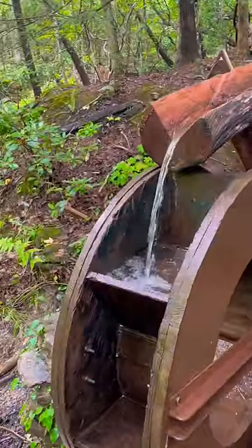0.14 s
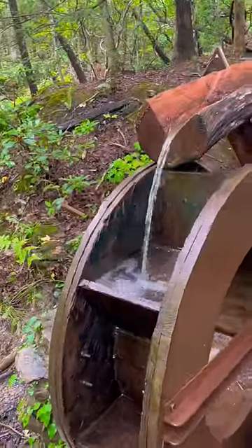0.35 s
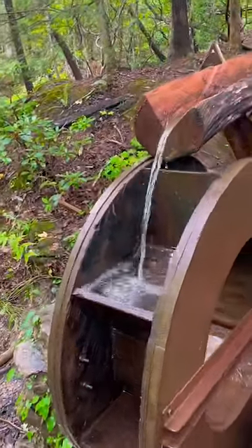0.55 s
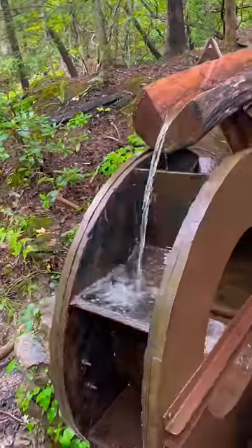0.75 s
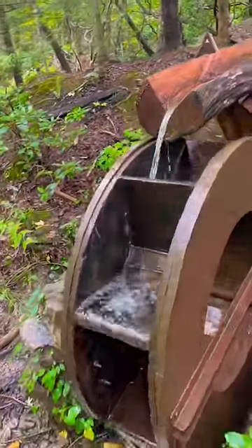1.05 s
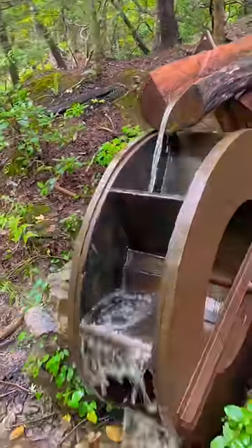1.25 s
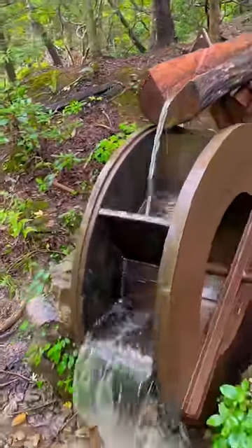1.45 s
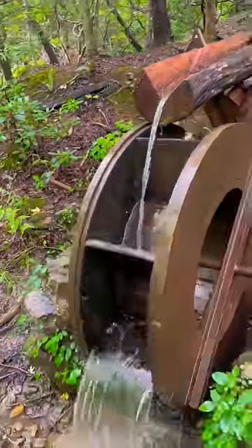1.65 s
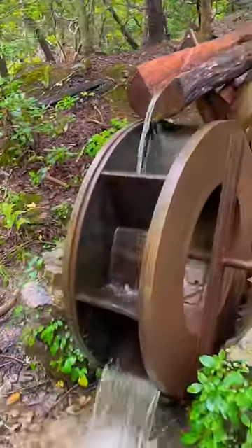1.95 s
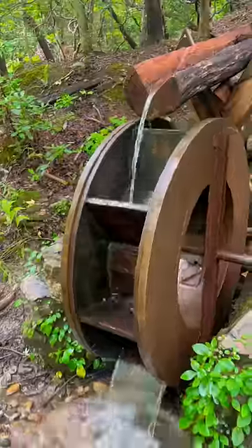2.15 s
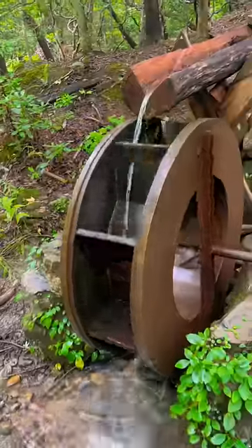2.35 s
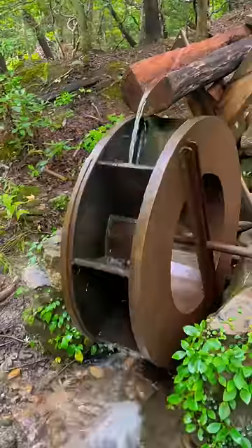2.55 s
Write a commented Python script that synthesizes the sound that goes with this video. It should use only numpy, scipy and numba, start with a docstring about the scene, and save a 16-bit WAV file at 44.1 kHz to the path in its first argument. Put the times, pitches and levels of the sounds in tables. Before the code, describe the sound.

Water wheel outdoors, heard close on a phone in stereo: bright trickling and hollow drumming in a wooden box, a sudden spray and splashing pour with deep gulps, then a quick fade to soft running water.

```python
"""Water wheel bucket fills and tips

A thin stream falls from a log spout into a wooden bucket: ringing bubbles plink and the box sounds hollow.
The wheel turns, a blade cuts the stream, and the bucket tips out: spray first, then a splashing sheet, low
gulps in the pool and last drips. Bubbles are fading sines; slaps, thuds and ticks are puffs of noise.
A brook made of many random bubbles runs behind; a phone with two microphone ports listens from close by."""
import sys
import numpy as np
from scipy import signal
from scipy.fft import rfft, irfft
from scipy.io import wavfile
from numba import njit

SR = 44100
rng = np.random.default_rng(int(sys.argv[2]) if len(sys.argv) > 2 else 0)


def to_wav(s):
    """Save 16-bit WAV."""
    ch = np.atleast_2d(s).T  # columns
    pcm = np.round(np.clip(ch, -1, 1) * 32767)  # PCM
    wavfile.write(sys.argv[1], SR, pcm.astype(np.int16))


N = 119070  # samples, 2.7 s
T = np.arange(N) / SR  # time in seconds
F = np.arange(N + 1) * SR / (2 * N)  # frequencies in Hz of a spectrum twice as long as the sound


def undb(db):
    """Turn decibels into a gain."""
    return 10 ** (np.asarray(db) / 20)


def curve(table, column=1):
    """Join one column of a table by straight lines in time."""
    rows = np.array(table)
    return np.interp(T, rows[:, 0], rows[:, column])


def shape(table):
    """Join a table by straight lines over log frequency."""
    hz, value = np.array(table).T
    return np.interp(np.log(F + 1), np.log(hz), value)


def filtered(x, gain):
    """Apply a frequency response."""
    return irfft(rfft(x, 2 * N) * gain)[..., :N]


def unit(x):
    """Scale to rms 1."""
    return x / np.sqrt(np.mean(x ** 2))


def tinted(pair, colour):
    """Give a sound its colour, at rms 1."""
    return unit(filtered(pair, undb(shape(colour))))


def band(hz, width):
    """Make noise around one pitch, at rms 1; the width is relative to that pitch."""
    offset = (F / hz - hz / (F + 1)) / width
    return unit(filtered(rng.standard_normal((2, N)), 1 / (1 + offset ** 2)))


def surge(rate, depth_db):
    """Make the flow uneven: a gain that heads for a new random level `rate` times a second."""
    knots = rng.standard_normal(1024)
    return undb(depth_db * np.interp(T * rate, np.arange(len(knots)), knots))


# pitch rise over a bubble's life, as a fraction; swell time, as a fraction of its life
GLIDE, SWELL = 0.069, 0.096


@njit
def ring(start, hz, cycles, size, side, glide, swell):
    """Add up bubbles: sines that swell, fade by 60 dB and rise in pitch; row 2 is their sideways scatter."""
    out = np.zeros((2, N))
    for k in range(len(hz)):
        life = cycles[k] * SR / hz[k]  # in samples
        first = int(start[k] * SR)
        phase = 0.
        level, fade = size[k], np.exp(-np.log(1000) / life)
        shut, opening = 1., np.exp(-1 / (swell * life))
        for i in range(max(0, min(int(life), N - first))):
            phase += 2 * np.pi * hz[k] / SR * (1 + glide * i / life)
            level *= fade
            shut *= opening
            value = level * (1 - shut) * np.sin(phase)
            out[0, first + i] += value
            out[1, first + i] += value * side[k]
    return out


def bubbles(table):
    """Play single bubbles from a table, each with its own pitch and ring, without sideways scatter."""
    start, db, hz, cycles = np.array(table, float).T
    start, cycles = np.maximum(start, 0), np.maximum(cycles, 2)
    return ring(start, hz.copy(), cycles, undb(db), 0 * db, float(GLIDE), float(SWELL))


def cloud(rate, low_hz, high_hz, cycles, spread_db):
    """Ring `rate` random bubbles a second, of uneven loudness unless spread_db is 0, with even power per Hz."""
    draws = np.random.default_rng(rng.integers(2 ** 31)).random((int(rate * N / SR), 5))
    when, pitch, loudness, length, place = draws.T
    low, high = np.sqrt(low_hz), np.sqrt(min(high_hz, .4 * SR))
    hz = (low + pitch * (high - low)) ** 2
    # a positive spread makes a few bubbles stand out, a negative one makes a few weaker
    size = undb(-spread_db * np.log(loudness + 0.19)) * hz ** .75
    side = np.sqrt(12) * (place - .5)
    return ring(when * N / SR, hz, cycles * (.5 + length), size, side, float(GLIDE), float(SWELL))


def wooden(modes):
    """Let wood resonate: each mode answers best at its own pitch and rings on for its t60."""
    return sum(undb(db) / (1 + 2j * np.pi * (F - hz) * t60 / np.log(1000)) for hz, db, t60 in modes)


# Tone colour of the brook. Each row: frequency in Hz, relative strength in dB.
BROOK_COLOUR = [(100,-1),(350,-2.5),(800,-5),(1800,-4.5),(4000,-8),(6200,1),(8500,-8),(12000,-7.5),(14000,-24),(16000,-9)]
# Tone colour of the open-air rumble. Each row: frequency in Hz, relative strength in dB.
RUMBLE_COLOUR = [(20,-62),(48,2),(80,-0.5),(140,-8),(300,-6.5),(900,-80)]


def brook():
    """Water runs steadily behind the wheel as a dense cloud of bubbles, over a low noise rumble of open air."""
    water = cloud(rate=7000, low_hz=127.0, high_hz=16100, cycles=15, spread_db=-2.5)
    water = tinted(water, BROOK_COLOUR) * surge(rate=20, depth_db=0.6)
    rumble = tinted(rng.standard_normal((2, N)), RUMBLE_COLOUR)
    return undb(-48.0) * water + undb(-56.5) * rumble


def burst(start, db, hz, length, width):
    """An impact: a puff of noise around one pitch swells at once and falls by 60 dB in its length."""
    age = np.maximum(T - start, 0) / length
    return band(hz, width) * undb(db - 60 * age) * (1 - np.exp(-age / 0.076))


# Lumps of water that slap wood or pool.
# Each row: start in seconds, level in dB before the swell, centre in Hz, length in seconds.
SLAPS = [(0.0786,-28,1190,0.025),(0.347,-41,1600,0.011),(0.817,-36,4600,0.054),(0.921,-29.5,755,0.048),(1.032,-25.5,8040,0.03),(1.072,-25.5,3630,.045),(1.076,-24,1530,0.023),
         (1.3216,-26.5,2400,0.052),(1.3845,-12.5,2200,0.017),(1.404,-19.5,5450,0.068),(1.687,-23.5,2480,0.096),(1.708,-21.5,1580,0.033),(1.74,-25,1390,0.12),(1.979,-25,1800,.15),
         (2.32,-28.5,744,0.059),(2.423,-29.5,600,0.067),(2.466,-38,1180,0.036)]
# The bulk of the water thudding into the pool.
# Each row: start in seconds, level in dB before the swell, centre in Hz, length in seconds.
THUDS = [(1.81,-51,74.4,.15),(2.107,-29.5,133,0.12)]
# Single drops that tick on bare wood. Each row: start in seconds, level in dB before the swell.
TICKS = [(0.305,-20),(0.6079,-15.5),(2.342,-20.5)]


def impacts():
    """Falling water slaps and thuds as broad puffs of noise; drops on wood tick as short, high ones."""
    slaps = sum(burst(*slap, width=1.0) for slap in SLAPS)
    thuds = sum(burst(*thud, width=0.53) for thud in THUDS)
    ticks = sum(burst(start, db, hz=7500, length=0.014, width=0.45) for start, db in TICKS)
    return slaps + thuds + ticks


WALL_S, WALL_DB = .0021, -15.5  # delay in seconds and level of the plank's echo
BOX_T60_S, BOX_DB = 0.1, -4.5  # time in which the box's tail falls by 60 dB; its level


def boxed(pair):
    """The facing plank gives one quick echo, and the wooden box adds a short tail of fading noise."""
    tail = rng.standard_normal((2, N)) * undb(-60 * T / BOX_T60_S) * (T > WALL_S)
    tail = undb(BOX_DB) * unit(tail) / np.sqrt(N)
    echo = undb(WALL_DB) * np.exp(-2j * np.pi * F * WALL_S)
    return filtered(pair, 1 + echo) + filtered(pair[0], rfft(tail, 2 * N))


# Bubbles in the filling bucket.
# Each row: start in seconds, level in dB, starting pitch in Hz, ring length in cycles of that pitch.
PLINKS = [(0.0177,-24.5,4370,52), (0.0726,-19.5,1170,10.5), (0.0818,-22,3850,44), (0.1202,-23.5,3720,62),
          (.1790,-17,1950,16), (.207,-37,1680,14), (0.2202,-16,2470,21), (.271,-28,3300,30),
          (.2845,-24.5,3200,18), (0.3447,-28,1080,13), (.3619,-26,2450,44), (.382,-19,1276,18),
          (0.3843,-29,2380,36), (.468,-32,1110,28), (.486,-30,1390,31), (0.5123,-20,2530,21),
          (0.5499,-18.5,3600,33), (0.557,-25,2930,30), (.6544,-26.5,2040,33), (.661,-26,4200,30),
          (0.7868,-18.5,4520,21), (0.8227,-23,4920,45), (0.8284,-11,2500,10.4), (.850,-35,1390,16),
          (.8672,-33,2750,20), (0.9229,-18,3040,20), (.9270,-19.5,3475,33), (.9365,-23,3450,36)]
DROP_SPRAY_DB, DROP_SPRAY_S = -16, 0.012  # a drop's spray relative to its bubble; seconds to fall by 60 dB


def plinks():
    """Each drop sends up a brief hiss of spray and leaves a ringing bubble."""
    spray = 0
    for start, db, hz, cycles in PLINKS:
        age = np.maximum(T - start, 0) / DROP_SPRAY_S
        spray = spray + undb(db - 60 * age) * (T >= start)
    return bubbles(PLINKS) + undb(DROP_SPRAY_DB) * spray * band(hz=3400, width=1.5)


# Tone colour of the stream's babble. Each row: frequency in Hz, relative strength in dB.
STREAM_COLOUR = [(150,6.5),(330,10),(550,-1),(800,5),(1050,-1),(1450,6),(2600,-2),(4000,0.5),(6800,-17),(9000,-42)]
# Tone colour of its fizz. Each row: frequency in Hz, relative strength in dB.
FIZZ_COLOUR = [(3000,-13.5),(5500,-16),(7400,-6),(9500,-13),(11500,-13),(13500,-31),(16000,-14)]
# Hollow ring of the bucket.
# Each row: pitch in Hz, relative strength in dB, time to fall by 60 dB in seconds.
BUCKET = [(154.5,-3,.4),(288,-7,0.18),(334.8,1.7,0.3),(416,-9.5,0.11),(780,-37,0.11),(1610,-30,0.16)]
# Strength of the thin stream. Each row: time in seconds, gain in dB on babble and fizz.
STREAM_STRENGTH = [(0,-0.5),(.2,-0.5),(.32,-3),(.45,-2),(.7,0.5),(.93,-2.5),(.98,-10),(1.1,-6),(2.3,-13.5),(2.7,-7.5)]
# How hard the stream drums the bucket. Each row: time in seconds, level of the hollow ring in dB.
DRUMMING = [(0,-54.5),(.3,-48.5),(.5,-56),(.6,-48.5),(.92,-47.5),(1,-60),(2.7,-106)]


def stream():
    """The thin stream makes small bubbles, fizz and plinks, and its drumming rings the hollow bucket."""
    babble = boxed(cloud(rate=1600, low_hz=133.0, high_hz=6560, cycles=27.5, spread_db=5.0))
    babble = undb(-45.5) * tinted(babble, STREAM_COLOUR)
    fizz = cloud(rate=3500, low_hz=2700, high_hz=17000, cycles=7.6, spread_db=7.0)
    fizz = undb(-48.0) * tinted(fizz, FIZZ_COLOUR)
    knocks = cloud(rate=700, low_hz=95, high_hz=1850, cycles=2.46, spread_db=3.5)
    hollow = unit(filtered(knocks, wooden(BUCKET)))
    water = (babble + fizz) * undb(curve(STREAM_STRENGTH)) * surge(rate=65, depth_db=4.5)
    return water + hollow * undb(curve(DRUMMING)) + boxed(plinks())


# Resonances of the lower buckets and planks, rung by the pour.
# Each row: pitch in Hz, strength in dB relative to the direct sound, time to fall by 60 dB in seconds.
WHEEL = [(270.5,0,0.17),(349.6,-1.5,0.25),(465,-2.5,0.16),(629,3,0.18),(681,1.5,0.24),(779.5,-1,0.23),(910,-11,0.23),(1900,0.5,0.11),(2165,-5,0.14),(2336,-1,0.11),(3172,-5,0.16),(5210,-14,0.11)]
# Tone colour of the gurgle. Each row: frequency in Hz, relative strength in dB.
GURGLE_COLOUR = [(60,-14.5),(150,-12),(250,-10.5),(350,-1.5),(500,-1),(700,-5.5),(950,-5),(1800,-12.5)]
# Tone colour of the splash. Each row: frequency in Hz, relative strength in dB.
SPLASH_COLOUR = [(500,-21),(850,-2),(1400,-2.5),(2200,-2),(3200,-9.5),(4500,-8.5),(8000,-14)]
# Tone colour of the spray. Each row: frequency in Hz, relative strength in dB.
SPRAY_COLOUR = [(2000,-6),(3600,-1),(4300,-3),(5400,3),(7000,1),(9000,-2.5),(12000,-4.5),(13500,-15),(16000,-14)]
# The emptying bucket, before each layer's fixed trim.
# Each row: time in seconds, gurgle in dB, splash in dB, spray in dB.
POUR = [(1.0, -101, -82, -61), (1.07, -51, -46, -40.5), (1.088, -47, -35, -42.5), (1.17, -42, -34, -39.5),
        (1.288, -49, -39, -43.5), (1.37, -44.5, -32.5, -34), (1.41, -40, -29, -33),
        (1.544, -40, -30.5, -33.5), (1.69, -35.5, -26, -34), (1.934, -39.5, -31.5, -35),
        (2.028, -32.5, -29, -36), (2.09, -37.5, -33.5, -39.5), (2.2, -34, -34, -40.5),
        (2.305, -45, -39, -44), (2.332, -43.5, -41, -49), (2.352, -42.5, -44, -41),
        (2.368, -50.5, -54, -55), (2.388, -55, -63, -52), (2.4, -48.5, -58, -51)]
POUR_RISE_DB_S, POUR_FALL_DB_S = 295, 72  # slopes before the first row and after the last, in dB per second
# Large bubbles in the bucket and the pool below.
# Each row: start in seconds, level in dB, starting pitch in Hz, ring length in cycles of that pitch.
GULPS = [(.531,-32.5,790,22),(.553,-27.5,310,13),(.571,-24,327,10),(.612,-25,353,17),(.626,-26,332,18),(.847,-32,602,14),(.848,-36,345,23),(.884,-31,328,13),
         (1.160,-18.5,910,22),(1.420,-23,1270,82),(1.459,-21.5,710,56),(1.492,-13.5,1060,16),
         (1.551,-17.5,394,17),(1.716,-20,1160,39),(1.718,-9,1680,19),(1.957,-16.5,596,41),(1.996,-27,334,31),
         (2.010,-25,636,70),(2.015,-19.5,274,11),(2.024,-21,905,64),(2.028,-12.5,750,18),(2.045,-23,347,13),
         (2.191,-15.5,723,31),(2.218,-18.5,855,40),(2.247,-19.5,753,29),(2.384,-30.5,1360,37),(2.420,-26.5,288,10),(2.421,-21.5,930,17),(2.520,-29,356,10)]
# Small bright bubbles where the pour spatters.
# Each row: start in seconds, level in dB, starting pitch in Hz, ring length in cycles of that pitch.
SPATTERS = [(1.068,-19,3940,89),(1.126,-23,3500,78),(1.3232,-15,1920,4.4),(1.3852,-15,2200,25),(1.386,-30,2600,20),
            (1.442,-16,5100,100),(1.577,-17,3290,60),(1.653,-17,2110,61),(1.693,-15,2100,30),
            (1.877,-14,2800,31),(1.992,-16,3580,33)]


def pour():
    """The bucket tips out: spray, splash and gurgle are bubble clouds in their own spurts, ringing the wheel."""
    wheel = 1 + wooden(WHEEL)
    gurgle = cloud(rate=1400, low_hz=58.5, high_hz=1516, cycles=24.6, spread_db=2.0)
    gurgle = undb(0.56) * tinted(filtered(gurgle, wheel), GURGLE_COLOUR)
    splash = cloud(rate=3000, low_hz=603.0, high_hz=4545, cycles=35.5, spread_db=1.7)
    splash = undb(-5.5) * tinted(filtered(splash, wheel), SPLASH_COLOUR)
    spray = cloud(rate=11000, low_hz=2538, high_hz=15420, cycles=41, spread_db=0.0)
    spray = undb(2) * tinted(filtered(spray, wheel), SPRAY_COLOUR)
    sheet = 0
    for column, layer in enumerate([gurgle, splash, spray], start=1):
        sheet = sheet + layer * undb(curve(POUR, column)) * surge(rate=49, depth_db=0.56)
    before, after = np.maximum(POUR[0][0] - T, 0), np.maximum(T - POUR[-1][0], 0)
    edges = undb(-POUR_RISE_DB_S * before - POUR_FALL_DB_S * after)
    return sheet * edges + bubbles(GULPS) + bubbles(SPATTERS)


# How widely sounds scatter left and right. Each row: frequency in Hz, strength in dB.
SCATTER = [(150,-28.5),(1000,-15.5),(2800,-3),(5300,-9.5),(7500,-50),(9300,-10.5),(14000,-15.5)]
# Phase lead of the left port over the right. Each row: frequency in Hz, lead in radians.
PORT_LEAD = [(150,0),(800,.9),(1900,0),(3000,0),(4300,.8),(5200,-.1),(7200,3),(8100,3.3),(10400,6.2),(11700,6.4),(13300,9.3),(15500,9.6)]
EVEN_HZ = 6000  # both ports get the same gain from here up


def ports(pair, side):
    """Two microphone ports hear a sound with unlike level and phase; its scatter is opposite in the two."""
    sign = np.array([[1], [-1]])  # left, right
    wide = filtered(pair[1], undb(shape(SCATTER)))
    balance_db = shape(np.vstack([side, (EVEN_HZ, 0)]))
    gain = undb(sign * balance_db / 2) * np.exp(.5j * sign * shape(PORT_LEAD))
    return filtered(pair[0] + sign * wide, gain)


# Left minus right for the top of the wheel. Each row: frequency in Hz, difference in dB.
TOP_SIDE = [(380,0.5),(750,11),(1400,7),(2100,3),(3100,8.5),(4200,0.5)]
# Left minus right for the foot of the wheel. Each row: frequency in Hz, difference in dB.
FOOT_SIDE = [(420,.5),(650,5),(1250,5.5),(1750,-1),(2800,-5.5),(4000,-1.5)]


def scene():
    """Place the stream at the top of the wheel; pour, impacts and brook come from the side of its foot."""
    return ports(brook() + impacts() + pour(), FOOT_SIDE) + ports(stream(), TOP_SIDE)


TOP_HZ = 15900  # highest frequency the phone passes


def record(dry):
    """The phone cuts the top with a steep low-pass filter."""
    return signal.sosfilt(signal.ellip(10, .2, 80, TOP_HZ, fs=SR, output="sos"), dry)


dry = scene()
out = record(dry)
to_wav(out)
```